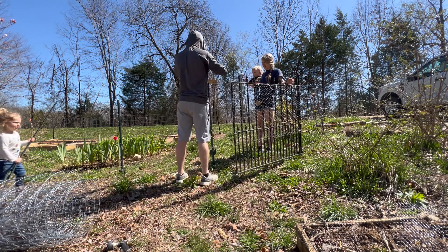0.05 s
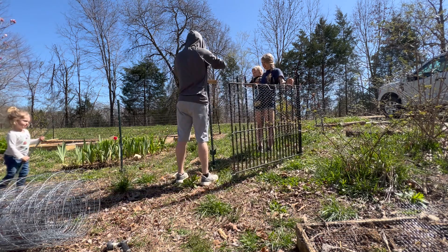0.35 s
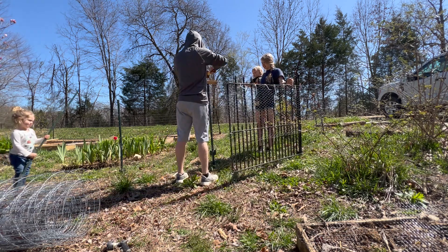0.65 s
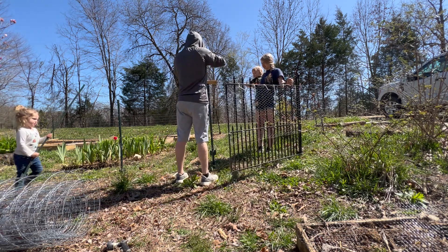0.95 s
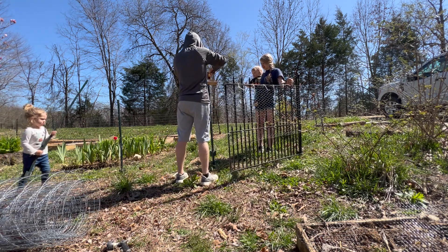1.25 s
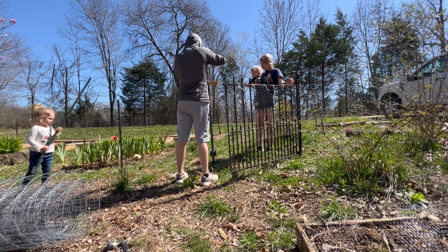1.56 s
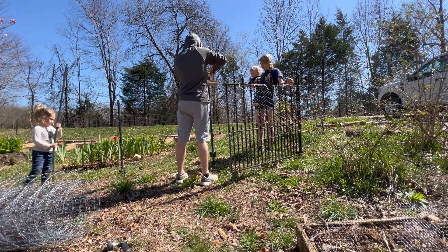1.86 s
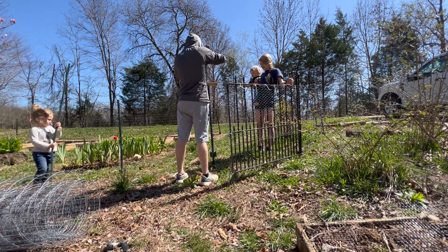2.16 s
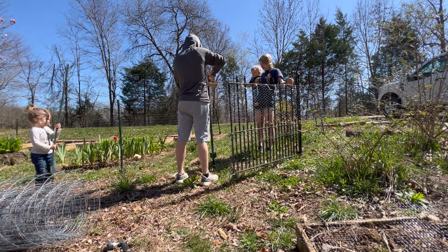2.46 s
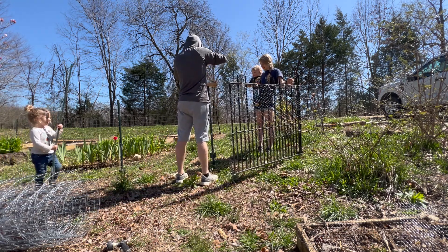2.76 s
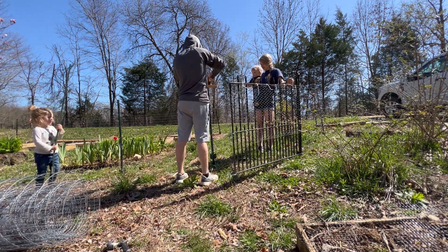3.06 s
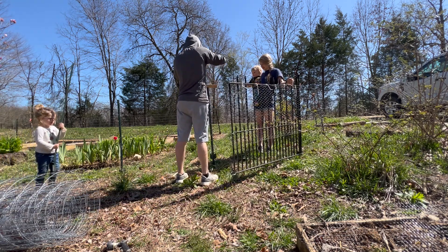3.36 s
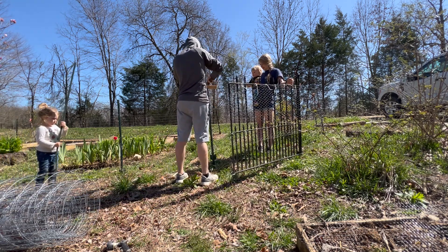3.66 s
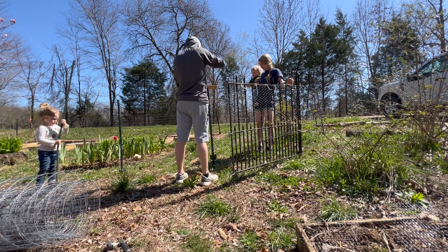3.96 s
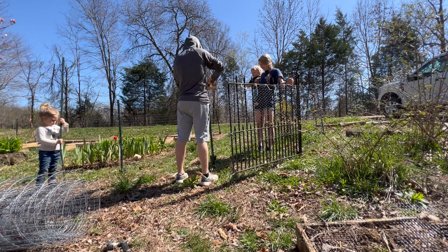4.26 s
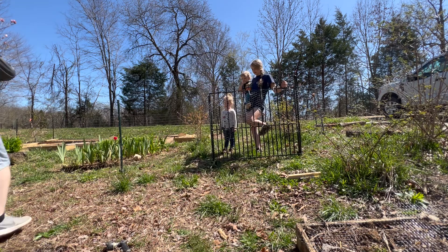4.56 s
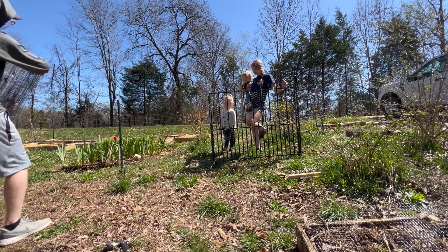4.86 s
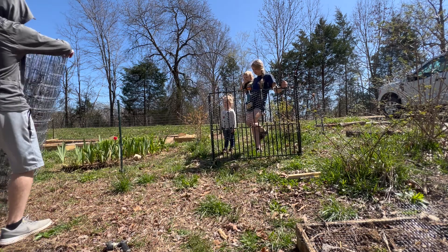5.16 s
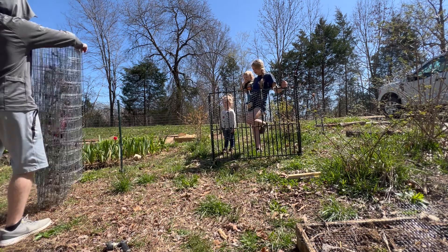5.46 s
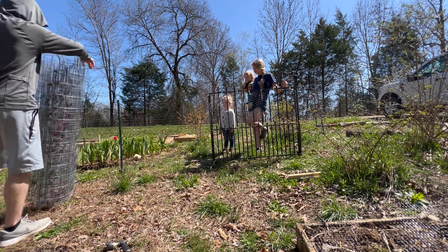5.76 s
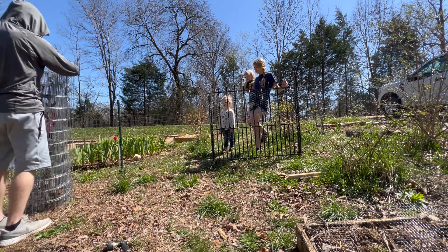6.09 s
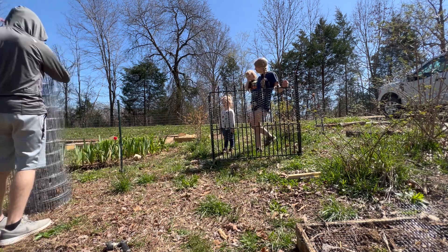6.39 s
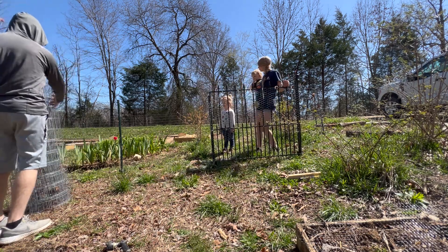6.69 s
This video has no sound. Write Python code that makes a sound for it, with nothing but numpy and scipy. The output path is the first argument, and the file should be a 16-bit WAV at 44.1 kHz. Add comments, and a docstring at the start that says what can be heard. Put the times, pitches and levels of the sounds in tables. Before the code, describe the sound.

A soft rumble of open air and the faint throb of a far engine run throughout in a garden. During the first three seconds or so, dry leaves rustle lightly underfoot on the left. At about 0.5 seconds, hammering on a steel fence post begins: seven evenly spaced blows, roughly 0.6 seconds apart, the last at about 4.2 seconds. Each is a sharp knock with a bright crack, a brief metallic ring and a short outdoor echo. At 4.4 seconds a roll of wire mesh starts abruptly, close on the left. As it is carried, its wires rub, rattle and tick, and some snap free with small, high clinks. Around 5.8 to 6 seconds the roll is stood up with its loudest, brightest scrapes. It then settles, with a softer shove near 6.7 seconds.

```python
"""A far engine throbs in a garden throughout, over a soft rumble of air; at first dry leaves rustle underfoot.
From half a second on, seven hammer blows drive in a steel fence post: each is a dispersive bending-wave
knock with a contact crack, a brief ring and a short outdoor echo.
From 4.4 s a roll of wire mesh is carried on the left: its wires rub, tick, snap free and ring.
Near 5.8 s it is stood up with its hardest shoves, and then it settles."""
import sys
import numpy as np
from scipy import signal
from scipy.fft import rfft, irfft
from scipy.io import wavfile
from scipy.ndimage import uniform_filter1d

SR = 44100
rng = np.random.default_rng(int(sys.argv[2]) if len(sys.argv) > 2 else 0)


def inscribe(sig):
    """Save sig as 16-bit PCM at rate SR to the path in sys.argv[1].

    A 1-D sig is mono; a 2-D sig holds one channel per row.
    Samples are clipped to [-1, 1] before scaling.
    """
    pcm = np.round(np.clip(np.atleast_2d(sig).T, -1, 1) * 32767)
    wavfile.write(sys.argv[1], SR, pcm.astype(np.int16))


N = 305632
TIME = np.arange(N) / SR
HZ = np.maximum(np.fft.rfftfreq(N, 1 / SR), 1)

# Levels in the tables are relative: each source applies its own gains.
# spectrum of the open air: frequency_hz, level_db
AIR_SPECTRUM = [(25, -18), (50, 3.5), (90, 2.5), (125, 4.5), (200, -4), (300, -16), (500, -21), (1000, -19),
                (1600, -26.5), (2400, -38), (5000, -44), (16000, -65)]
# faint far whistles: start_s, length_s, start_hz, end_hz, level_db
FAR_WHISTLES = [(.5, 0.59, 824, 909, -63.5), (1.205, 0.34, 890, 1032, -67), (3.432, 0.1, 2940, 2880, -80)]
# the engine's firing rate: time_s, rate_hz
FIRING_RATE = [(0, 103.5), (4.2, 103.6), (4.45, 105.9), (5.6, 106), (5.8, 106.8)]
# envelope of its throb: time_s, level_db
THROB_LEVEL = [(0.0, -55), (1.56, -48.5), (2.26, -50.5), (2.72, -61), (3.38, -64), (3.71, -54), (4.71, -50),
               (5.34, -44), (6.29, -53), (6.93, -49.5)]
# its weaker lines: multiple_of_firing_rate, level_db
ENGINE_LINES = [(.43, -69.5), (.51, -59.5), (.61, -70.5), (.77, -68), (1.28, -58.5), (1.55, -68.5),
                (2, -64.5), (4, -78)]
# steps and shuffles in dry leaves: centre_s, half_length_s, level_db
FOOTSTEPS = [(.15, 0.91, -75), (.7, 0.25, -71), (0.782, 0.024, -62), (1.128, 0.035, -51.5),
             (1.2, 0.25, -71), (1.976, 0.0015, -51), (1.981, 0.0016, -47), (1.98, 0.3, -70.5),
             (2.195, 0.12, -63), (2.223, 0.014, -54), (2.6, 0.19, -73), (2.64, 0.028, -67),
             (3.3, 0.51, -79.5)]
# spectrum of crackling leaves: frequency_hz, level_db
LEAF_SPECTRUM = [(1200, -2.5), (2300, -1), (3300, -3.5), (4500, 0), (7000, -1.5), (9000, -0.5),
                 (10500, -11.5), (12500, -8.5), (16000, -13.5)]
# shadowing of a sound from the left: frequency_hz, left_minus_right_db
SIDE_SHADOW = [(300, 3.5), (700, 3.5), (1300, 6.5), (2000, 11.5), (3200, 1), (4400, -2), (5800, -7.5),
               (8500, -0.5), (12000, 0)]
# its delay on the right, longer for the lows, which bend round the receiver: frequency_hz, delay_s
SIDE_DELAY = [(1100, 0.00047), (1900, 0.00055), (3300, 0.000452), (5300, 0.000386), (8500, .000238),
              (10400, .00024), (14000, .00025)]
# spectra of the mesh's scrape, rattle and drone: frequency_hz, level_db
SCRAPE_SPECTRUM = [(2200, -17), (3300, 0), (4000, 7.5), (4800, 5), (7200, 6.5), (8500, 7.5), (10000, -2),
                   (12000, 5), (15300, 5), (16200, -7)]
RATTLE_SPECTRUM = [(200, -9.5), (350, -5), (1000, 4), (1300, 2), (1800, -2.5), (2100, -0.5), (2750, 1.5),
                   (3300, -12.5), (4500, 0.5), (8000, -17)]
DRONE_SPECTRUM = [(250, -16.5), (430, -9.5), (520, -6), (680, 3.5), (790, 6.5), (900, -2), (1100, -5),
                  (1600, -22)]
# the clearest ringing wires: pitch_hz
CLEAR_WIRES = [4700, 4650, 6190, 6160, 6700, 7580, 8340, 8200, 9700, 9050]
# shoves that flex the roll: peak_s, scrape_db, rattle_db, drone_db
ROLL_SHOVES = [(4.621, -48, -57, -54), (4.788, -45, -53.5, -52), (5.11, -59.5, -70, -49),
               (5.255, -68, -49.5, -46.5), (5.48, -48, -47.5, -44.5), (5.77, -39, -48.5, -53),
               (5.852, -30.5, -40, -40), (5.96, -36, -46, -46), (6.09, -53, -56, -42),
               (6.668, -52.5, -55.5, -45.5), (6.9, -64, -75, -59)]
# wires that snag and snap free: start_s, level_db, pitch_hz, clink_t60_s
WIRE_SNAPS = [(4.405, -48.5, 6020, 0.038), (4.436, -30, 6500, 0.0085), (4.481, -38, 4140, 0.016),
              (4.4855, -34.5, 5100, 0.0081), (4.642, -40, 3840, 0.029), (4.669, -32.5, 3980, 0.024),
              (4.778, -37.5, 6970, 0.02), (4.892, -42, 4260, 0.021), (4.9905, -33, 6700, 0.023),
              (5.7195, -34.5, 5250, 0.023), (5.827, -51, 5160, 0.028), (6.23, -50, 4740, .03)]
# reflections from the ground, fence and house: delay_s, level_db
GARDEN_ECHOES = [(.0058, -15), (0.0149, -21.5), (0.0438, -22.5), (0.0494, -26.5), (.053, -24), (0.114, -44)]
# hammer blows: start_s, knock_db, thud_db, clank_db, crack_db
HAMMER_BLOWS = [(0.4778, -20, -34.5, -26, -34), (1.117, -24, -35.5, -32, -34.5),
                (1.7117, -19.5, -25.5, -24, -31.5), (2.3253, -17, -25.5, -26, -32),
                (2.9877, -18.5, -32.5, -25, -29), (3.6171, -21.5, -27, -34, -31.5),
                (4.2352, -21, -28, -29.5, -33)]
# broad resonances of the post (a thud, two knocks, two clanks): centre_hz, width_oct, level_db, delay_s
POST_BANDS = [(183, 0.88, -3.5, 0.0042), (596, 0.35, -3.5, 0.0013), (946, 0.24, 5, 0.0017),
              (1727, 0.12, -0.5, .0019), (2450, 0.35, -12, .0016)]
# ringing modes of the post: pitch_hz, t60_s, level_db
POST_MODES = [(485, 0.042, -33), (616, 0.14, -34.5), (790, 0.086, -22.5), (980, 0.056, -41.5),
              (1570, 0.18, -43.5), (1851, .14, -51), (2910, 0.036, -26), (3840, 0.16, -27),
              (3880, 0.25, -26.5), (4150, .15, -26.5), (4250, .2, -30.5), (6800, 0.13, -32.5)]
# spectrum of each blow's bright crack as heard, with a narrow gap near 10.5 kHz: frequency_hz, level_db
CRACK_SPECTRUM = [(500, -13), (1300, 14.5), (2300, 9.5), (3300, 2.5), (6000, 6), (8500, 4.5),
                  (10500, -13.5), (12500, 4.5), (16000, -8.5)]

TOP_HZ = 16200
# the mesh's scrape, rattle and drone, in that order; the drone of the whole mesh lasts longest
CARRIED_DB, STANDING_DB = (-46.5, -54, -68), (-59, -76.5, -63.5)
SHOVE_T60_S = (0.94, 1.32, 2.08)


def undb(db):
    """Amplitude ratio of a level in decibels."""
    return 10 ** (np.asarray(db) / 20)


def unit(x):
    """Normalisation of power: rms 1."""
    return x / np.sqrt(np.mean(x ** 2))


def packet(x):
    """Normalisation of energy: that of 20 ms at rms 1."""
    return x * np.sqrt(SR / 50 / np.mean(np.sum(x ** 2, axis=-1)))


def gains(points, hz):
    """Frequency response interpolated between (frequency_hz, level_db) points on logarithmic axes."""
    f, db = np.transpose(points)
    return undb(np.interp(np.log(hz), np.log(f), db))


def colour(x, points):
    """Zero-phase filtering by a spectrum of (frequency_hz, level_db) points."""
    size = x.shape[-1]
    return irfft(rfft(x) * gains(points, np.maximum(np.fft.rfftfreq(size, 1 / SR), 1)), size)


def walk(rate_hz):
    """Slow random modulation of rms 1."""
    k = int(SR / rate_hz)
    return unit(uniform_filter1d(np.repeat(rng.standard_normal(N // k + 1), k), k)[:N])


def fade(t, t60):
    """Exponential damping: 60 dB down after t60 seconds."""
    return np.exp(-np.log(1000) * t / t60)


def add(out, start_s, x):
    """Superposition of a short sound on a longer one."""
    i = max(int(start_s * SR), 0)
    out[:, i:i + x.shape[-1]] += x[..., :N - i]


def convolve(x, response):
    """Convolution with an impulse response, cut to the input's length."""
    return signal.fftconvolve(np.atleast_2d(x), np.atleast_2d(response), axes=-1)[:, :x.shape[-1]]


def ticks(rate_hz, spread_db):
    """A Poisson process: independent impulses of random size."""
    size = undb(spread_db * np.minimum(rng.exponential(size=N), 5))
    return unit((rng.random(N) < rate_hz / SR) * size * rng.standard_normal(N))


def contacts(spectrum, rate_hz, spread_db, shared):
    """Shot noise of small contacts: a direct share of the power is common to both sides, the rest scatters."""
    direct = ticks(rate_hz, spread_db)
    scattered = np.array([ticks(rate_hz, spread_db), ticks(rate_hz, spread_db)])
    return unit(colour(np.sqrt(shared) * direct + np.sqrt(1 - shared) * scattered, spectrum))


def from_left(x):
    """Diffraction round the receiver: the sides differ in arrival time and level at each frequency."""
    lag = np.interp(HZ, *np.transpose(SIDE_DELAY))
    side = np.sqrt(gains(SIDE_SHADOW, HZ))
    return irfft(rfft(x) * np.array([side, np.exp(-2j * np.pi * HZ * lag) / side]), N)


def air(level_db=-53, side_db=-9, waver=.012):
    """Ambient noise, most coherent between the sides in the bass; far whistles waver on the way."""
    mid, side = rng.standard_normal((2, N))
    side = colour(side, [(150, side_db), (1200, -1.2)])
    rumble = unit(colour(mid + np.array([side, -side]), AIR_SPECTRUM))
    out = undb(level_db + walk(1)) * rumble * undb([[-1.2], [1.2]])
    for start_s, length_s, start_hz, end_hz, db in FAR_WHISTLES:
        progress = np.linspace(0, 1, int(length_s * SR))
        hz = (start_hz + (end_hz - start_hz) * progress) * (1 + waver * walk(60)[:len(progress)])
        envelope = undb(db + 3.3 * walk(25)[:len(progress)]) * np.sin(np.pi * progress)
        add(out, start_s, envelope * np.sin(2 * np.pi * np.cumsum(hz) / SR))
    return out


def engine(firing_db=3, second_hz=110.4, second_db=-7.5, in_step_s=5.25, waver_db=0.63, wobble_rad=0.13):
    """Beating: a far engine's firing note and a hum close in pitch throb at their difference frequency."""
    def line(cycles, db):
        """A spectral line with slight amplitude and phase modulation."""
        amplitude = np.sqrt(2) * undb(db + waver_db * walk(5.5))
        return amplitude * np.sin(2 * np.pi * cycles + wobble_rad * walk(25))

    firings = np.cumsum(np.interp(TIME, *np.transpose(FIRING_RATE))) / SR
    firings -= np.interp(in_step_s, TIME, firings)
    throb = line(firings, 0) + line(second_hz * (TIME - in_step_s), second_db)
    hum = throb * undb(np.interp(TIME, *np.transpose(THROB_LEVEL)) + firing_db)
    hum += sum(line(multiple * firings + rng.random(), db) for multiple, db in ENGINE_LINES)
    return hum * undb([[-1.6], [1.6]])


def leaves(level_db=-1, still_db=-94):
    """Modulated shot noise: dry leaves crackle under shifting feet on the left."""
    steps = sum(undb(db) * np.exp(-((TIME - s) / half_s) ** 2) for s, half_s, db in FOOTSTEPS)
    envelope = (undb(still_db) + steps) * undb(level_db + walk(14))
    return from_left(envelope * contacts(LEAF_SPECTRUM, rate_hz=6000, spread_db=3.0, shared=.85))


def handling(carried_db, standing_db, shove_db, t60,
             start_s=4.402, end_s=5.6, onset_s=0.0088, rise_s=0.055, hold_s=0.012):
    """Incoherent addition: carrying, standing and shoves sum in power to one envelope of the mesh."""
    carried = undb(carried_db) * fade(np.maximum(TIME - end_s, 0), t60)
    power = carried ** 2 + undb(standing_db) ** 2
    for (peak_s, *_), db in zip(ROLL_SHOVES, shove_db):
        rise = np.exp(-(np.minimum(TIME - peak_s, 0) / rise_s) ** 2)
        decay = fade(np.maximum(TIME - peak_s - hold_s, 0), t60)
        power += (undb(db) * rise * decay) ** 2
    return np.sqrt(power) * np.clip((TIME - start_s) / onset_s, 0, 1)  # the mesh sound starts abruptly


def mesh_ring(clear_db=4, ring_t60=0.17, count=700):
    """Modal superposition: hundreds of short wire spans each ring at their own note; a few stand out."""
    t = TIME[:SR // 4]
    notes = np.concatenate([CLEAR_WIRES, rng.uniform(3800, TOP_HZ, count)])
    sizes = np.concatenate([np.full(len(CLEAR_WIRES), undb(clear_db)), rng.random(count)])
    wires = sum(size * np.sin(2 * np.pi * (hz * t + rng.random())) for hz, size in zip(notes, sizes))
    return wires * fade(t, ring_t60)


def wire_roll(scrape_db=-0.5, rattle_db=3, drone_db=2, ring_db=-6, tick_db=-4,
              treble_hz=10200, brighten=0.19, even_db=-31.5):
    """Friction and impact: thousands of contacts scrape and rattle, the wires ring and the mesh drones."""
    shove_levels = np.transpose(ROLL_SHOVES)[1:]
    scrape_env, rattle_env, drone_env = map(handling, CARRIED_DB, STANDING_DB, shove_levels, SHOVE_T60_S)
    rubbing = undb(1.7 * walk(45)) * contacts(SCRAPE_SPECTRUM, rate_hz=7000, spread_db=-0.5, shared=0.88)
    ticking = contacts(SCRAPE_SPECTRUM, rate_hz=360, spread_db=1.5, shared=0.75)
    scrape = undb(scrape_db) * scrape_env * (rubbing + undb(tick_db) * ticking)
    scrape += undb(ring_db) * np.std(scrape) * unit(convolve(scrape, mesh_ring()))
    # a harder scrape is brighter: the top treble gains `brighten` dB per dB of envelope over even_db
    treble = irfft(rfft(scrape) * (HZ > treble_hz), N)
    scrape += treble * ((scrape_env / undb(even_db)) ** brighten - 1)
    rattle_env *= undb(rattle_db + 0.67 * walk(35))
    rattle = rattle_env * contacts(RATTLE_SPECTRUM, rate_hz=5000, spread_db=-0.5, shared=0.93)
    drone = undb(drone_db) * drone_env * contacts(DRONE_SPECTRUM, rate_hz=3700, spread_db=2.0, shared=1)
    return from_left(scrape + rattle + drone)


def snaps(tick_db=-8, clink_db=-5, mode_ratios=(1, 1.06, 1.39, 1.8)):
    """Free vibration after release: a snagged wire slips with a tick and clinks in inharmonic modes."""
    out, t = np.zeros((2, N)), TIME[:SR // 5]
    for start_s, db, hz, t60 in WIRE_SNAPS:
        burst = rng.standard_normal((2, len(t))) * fade(t, 0.11)
        tick = packet(colour(burst, [(900, -24), (4000, 13), (7000, 14), (16000, -24)]))
        modes = sum(np.sin(2 * np.pi * (k * hz * t + rng.random((2, 1)))) / k ** 2 for k in mode_ratios)
        clink = packet(modes * fade(t, t60))
        add(out, start_s, undb(db) * (undb(tick_db) * tick + undb(clink_db) * clink))
    return out


def garden_response(t, scatter_db, scatter_t60, tail_db, tail_t60):
    """Reflection and scattering: direct sound, nearby scatter, echoes and a duller tail from the trees."""
    near, far = rng.standard_normal((2, 2, len(t)))
    far = colour(far, [(6000, 3.5), (15000, -12.5)])
    response = undb(scatter_db) * near * fade(t, scatter_t60) * (1 - fade(t, 0.0068))
    response += undb(tail_db) * far * fade(t, tail_t60) * (1 - fade(t, 0.053))
    response[:, 0] += 1
    for delay_s, db in GARDEN_ECHOES:
        lag = rng.normal(delay_s, 0.00026, (2, 1))  # each echo comes from its own direction
        bump = np.exp(-((t - lag) * SR / 4) ** 2)  # rough surfaces return no treble
        response += undb(db) * bump / bump.sum(axis=1, keepdims=True)
    return response


def bending_wave(t, centre_hz, width_oct, delay_s, dispersion=0.0799):
    """Dispersion: a pulse in one band of the post takes delay_s + dispersion / sqrt(hz), so treble leads."""
    hz = np.maximum(np.fft.rfftfreq(len(t), 1 / SR), 1)
    band = np.exp(-.5 * (np.log2(hz / centre_hz) / width_oct) ** 2)
    travel = np.exp(-2j * np.pi * (delay_s * hz + 2 * dispersion * np.sqrt(hz)))
    return packet(irfft(band * travel, len(t)) * (t < t[-1] / 2))


def hammering(level_db=-1, crack_t60=.04, crack_delay_s=0.0024, ring_db=-28, firm_db=-25.5, hardening=0.63):
    """Impact excitation: each blow cracks on the steel and launches bending waves; the post's modes ring."""
    out, t = np.zeros((2, N)), TIME[:SR // 2]
    waves = [undb(db) * bending_wave(t, hz, width, delay_s) for hz, width, db, delay_s in POST_BANDS]
    crack_age = np.maximum(t - crack_delay_s, 0)
    crack_env = fade(crack_age, crack_t60) * (1 - fade(crack_age, 0.0038))
    for start_s, knock_db, thud_db, clank_db, crack_db in HAMMER_BLOWS:
        upper_knock_db = thud_db + hardening * (thud_db - firm_db)  # firm blows drive this band harder
        band_db = thud_db, knock_db, upper_knock_db, clank_db, (clank_db + thud_db) / 2
        knock = sum(undb(db) * wave for db, wave in zip(band_db, waves))
        garden = garden_response(t, scatter_db=-27.5, scatter_t60=0.048, tail_db=-54, tail_t60=0.49)
        knock = convolve(knock, garden) * undb([[.6], [-.6]])
        grit = rng.standard_normal((2, len(t))) + rng.standard_normal(len(t))
        crack = undb(crack_db) * packet(colour(grit * crack_env, CRACK_SPECTRUM))
        garden = garden_response(t, scatter_db=-43.5, scatter_t60=0.018, tail_db=-42, tail_t60=0.35)
        crack = convolve(crack, garden) * undb([[-1.5], [1.5]])
        blow = undb(level_db) * (knock + crack)
        # every blow lands a little differently and shares its force anew among the modes
        ring = sum(undb(db + rng.standard_normal()) * fade(t, t60) * np.cos(2 * np.pi * hz * t)
                   for hz, t60, db in POST_MODES)
        add(out, start_s, blow + undb(ring_db) * convolve(blow, ring))
    return out


def scene():
    """Linear superposition of all the sources in the garden."""
    return hammering() + wire_roll() + snaps() + leaves() + engine() + air()


def record(dry):
    """Band limiting: a steep low-pass filter removes the treble above TOP_HZ."""
    return signal.sosfilt(signal.ellip(10, .2, 80, TOP_HZ, fs=SR, output="sos"), dry)


dry = scene()
out = record(dry)
inscribe(out)
```